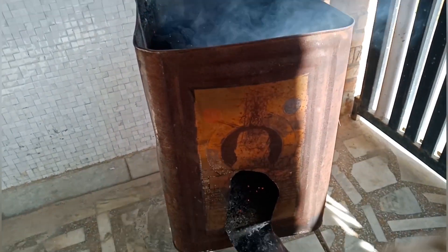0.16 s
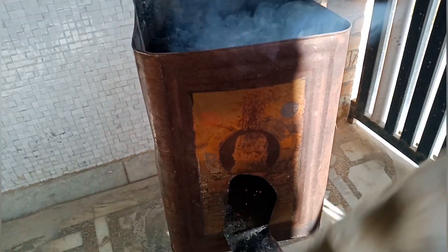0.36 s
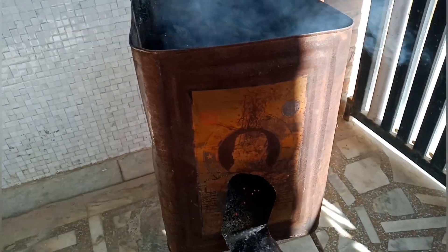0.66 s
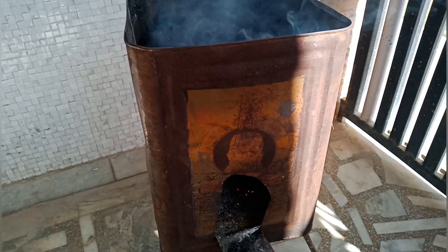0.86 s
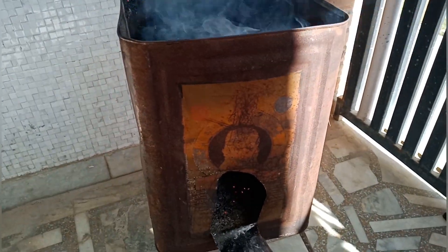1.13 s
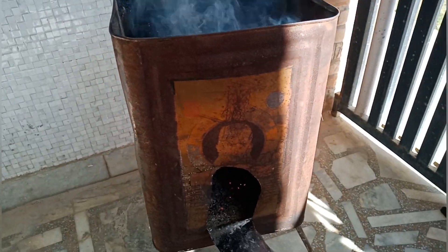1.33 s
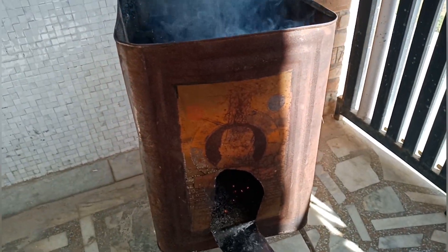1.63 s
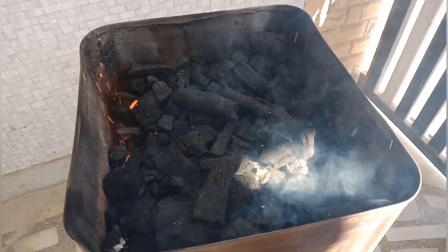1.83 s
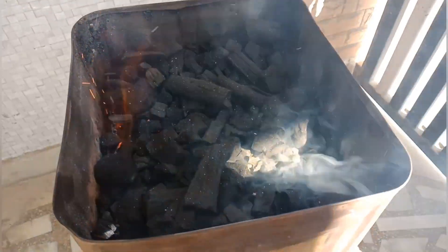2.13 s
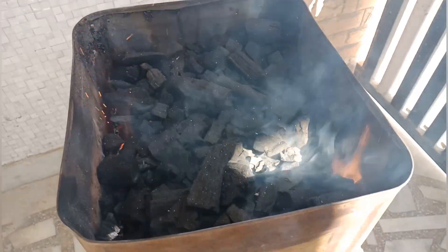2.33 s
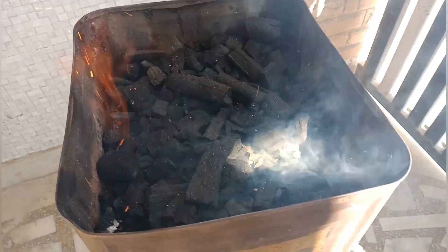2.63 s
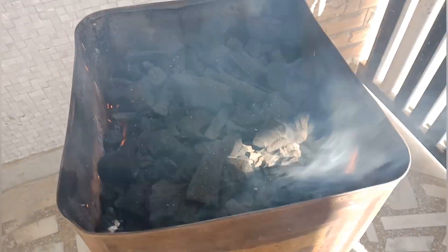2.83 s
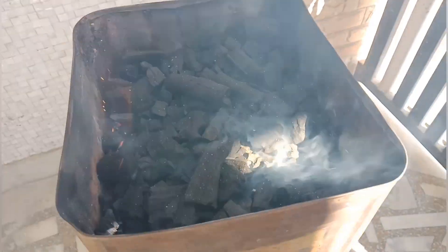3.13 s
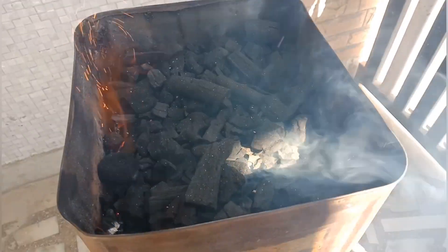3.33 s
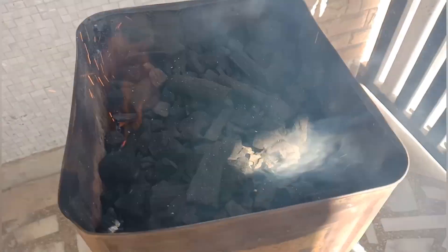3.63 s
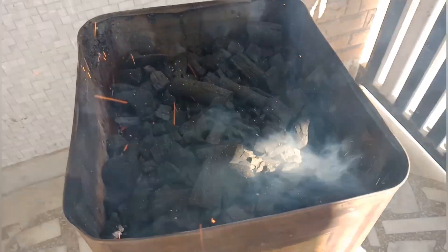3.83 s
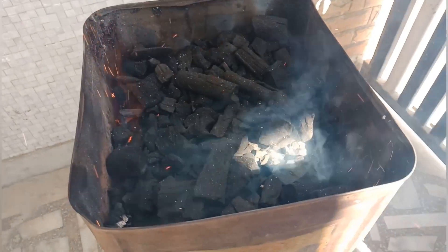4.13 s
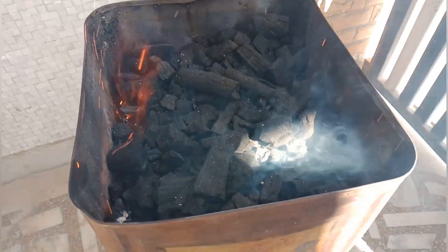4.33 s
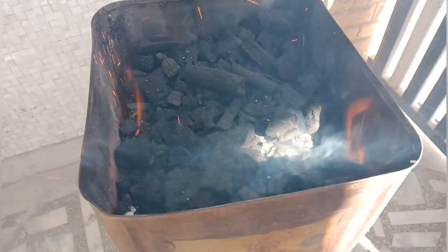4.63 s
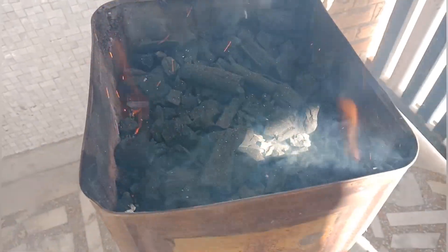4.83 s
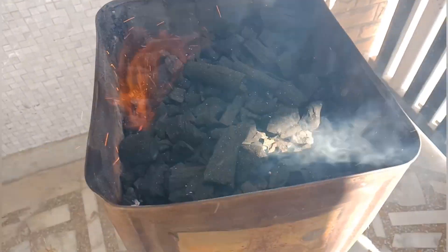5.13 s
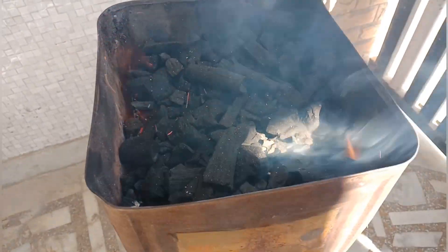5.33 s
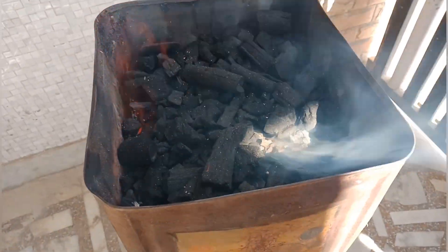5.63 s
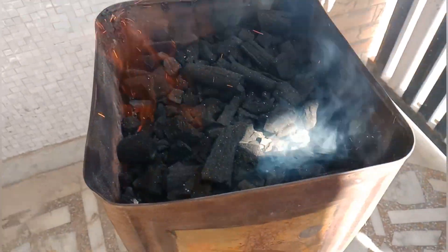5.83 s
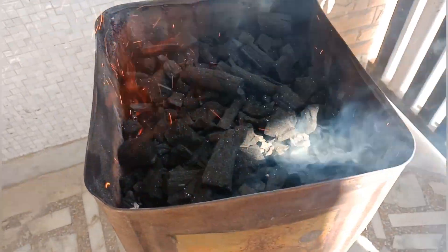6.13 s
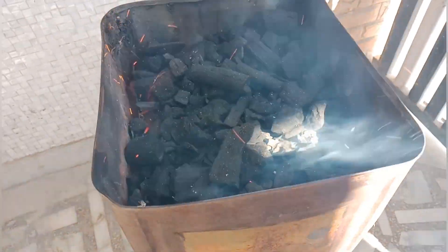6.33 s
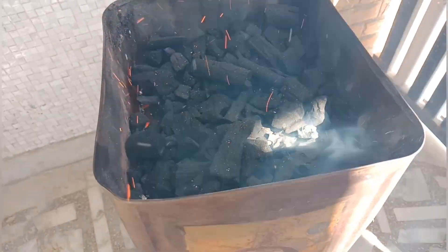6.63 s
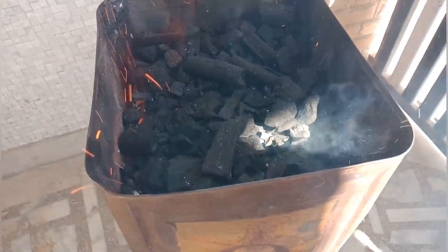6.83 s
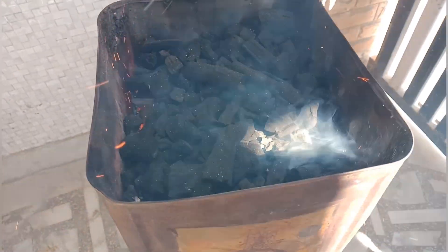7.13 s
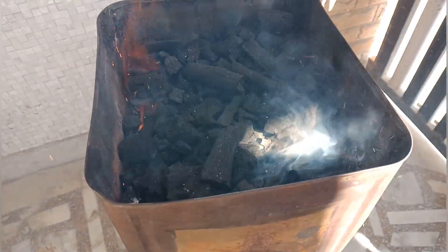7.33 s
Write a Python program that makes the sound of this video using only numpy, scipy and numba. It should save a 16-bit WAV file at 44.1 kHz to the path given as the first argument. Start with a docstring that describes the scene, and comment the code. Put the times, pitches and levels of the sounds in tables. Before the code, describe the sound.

From 0 to 0.9 s a quiet yard gives a soft, steady wide hush and a faint thin hum near 640 Hz. Cardboard makes short airy swishes, with a dull thud at the start and firmer thuds and dry edge ticks around 0.4-0.6 s. At 0.92 s a hard dull bang hits, followed at 1.04 s by a stronger, brighter one; both ring and echo between walls, fading until a cut at 1.77 s. After about 0.07 s of silence, charcoal is suddenly very close from 1.84 s. Loud, sharp, bright pops quickly thicken from 2.04 s, irregular and spread across stereo, with short wall reflections. Among them are swarms of tiny crackles, flickering sizzle, low pressure thumps and fluttering flame rumble. Heavier cracks land near 2.39, 4.3, 5.03, 5.39, 6.01 and 7.22 s. The beds briefly duck around the loudest pops; crackling stays dense to the end, about 7.46 s.

```python
"""Cardboard swishes and thuds over a quiet yard, then two hard bangs ring out and echo between the walls.
After a short silence the charcoal in a tin stove is close: loud pops, small pops, sizzle and flame rumble.
Pops and blows are coloured noise bursts with sharp fronts, the swishes and beds are shaped noise, the walls
are noise tails fading per octave, and a thin hum stays through both parts.
A look-ahead gain control leans in before loud sounds and lets go after them."""
import sys
import numpy as np
from scipy import signal
from scipy.fft import rfft, irfft, next_fast_len
from scipy.io import wavfile
from scipy.ndimage import uniform_filter1d, minimum_filter1d
from numba import njit

SR = 44100
rng = np.random.default_rng(int(sys.argv[2]) if len(sys.argv) > 2 else 0)


def transcribe(u):
    """Save the signal u as a 16-bit wav file named by the first command-line argument.

    u: samples, shape (n,) or (channels, n), limited to [-1, 1]; the rate is SR.
    q: integer samples, one column per channel.
    """
    v = np.clip(np.atleast_2d(u).T, -1, 1)
    q = np.round(v * 32767).astype(np.int16)
    wavfile.write(sys.argv[1], SR, q)


N = 329118
T = np.arange(N) / SR
LEAD = 64  # samples of build-up before a crack
KNEE_DB, RATIO = -6, 2.013  # gain control: threshold, input dB per output dB above it

# Fire between the loud pops. Each row: time in seconds, sizzle guide level in dB (small pops are set above
# it, the bed below it), flame rumble level in dB before flicker.
FIRE = [(1.84, -47, -53), (2.0, -43, -50), (2.23, -29, -40.5), (2.56, -32, -44), (2.87, -39.5, -47.5),
        (4.27, -32, -41), (4.53, -30.5, -49), (4.78, -41, -49), (5.27, -40.5, -49), (5.45, -27.5, -34),
        (5.66, -54, -50.5), (5.94, -24.5, -47.5), (6.41, -34, -36), (6.61, -26, -45.5), (6.97, -41.5, -47),
        (7.46, -22.5, -43.5)]
# Colour of the pops and of the sizzle. Each row: frequency in Hz, relative level in dB per Hz.
POP_TONE = [(150, -14.5), (350, 1.5), (730, 2), (1560, 8.5), (1780, -1), (2150, 2), (5400, 3), (8100, -7),
            (14800, -16), (16300, -22)]


def undb(db):
    """Gain of a level in dB."""
    return 10 ** (np.asarray(db) / 20)


def tone(table, size):
    """Bin gains of (Hz, dB) points: closed below the first, level above the last."""
    hz, db = np.transpose(table)
    bins = np.fft.rfftfreq(size, 1 / SR) + 1
    return undb(np.interp(np.log(bins), np.log(hz), db, left=-90, right=db[-1]))


def hiss(gain, alike):
    """Stereo noise of rms 1 with given bin gains; bass mostly shared by the ports, treble by the share alike."""
    size = 2 * (gain.shape[-1] - 1)
    bass = 1 / (1 + (np.fft.rfftfreq(size, 1 / SR) / 710) ** 2)  # crossover in Hz
    alike = np.clip(alike + (.85 - alike) * bass, 0, 1)
    white = rng.standard_normal(gain.shape[:-1] + (2, size))
    mid, side = gain * rfft(white).swapaxes(0, -2)
    mid, side = np.sqrt(1 + alike) * mid, np.sqrt(1 - alike) * side
    out = irfft(np.array([mid + side, mid - side]))
    return out / np.sqrt(np.mean(out ** 2))


def steady(table, alike):
    """A full-length noise of a given colour."""
    return hiss(tone(table, next_fast_len(N + 1) * 2), alike)[:, :N]


def walk(rate):
    """Random levels, one every 1 / rate seconds, joined by straight slews; spread somewhat below 1."""
    k = int(SR / rate)
    steps = np.repeat(rng.standard_normal(N // k + 1), k)
    return uniform_filter1d(steps, k)[:N]


def place(s, grains):
    """Lays grains (2, events, samples) out at their times in seconds."""
    length = grains.shape[2]
    out = np.zeros((2, N + length))
    for k, i in enumerate((np.asarray(s) * SR).astype(int)):
        out[:, i:i + length] += grains[:, k]
    return out[:, :N]


def echo(x, t60_table, colour):
    """Walls return a diffuse tail, each octave fading at its own rate."""
    t, tail = np.arange(65536) / SR, 0
    bins = np.fft.rfftfreq(len(t), 1 / SR) + 1
    t60_hz, t60_s = np.transpose(t60_table)
    for hz in 90 * 2. ** np.arange(8):
        t60 = np.interp(np.log(hz), np.log(t60_hz), t60_s)
        band = np.clip(1 - np.abs(np.log2(bins / hz)), 0, 1)
        tail = tail + np.sqrt(hz) * hiss(band, 0) * 10 ** (-3 * t / t60)
    onset = np.clip(t / 0.001, 0, 1)
    tail = irfft(rfft(tail) * tone(colour, len(t))) * onset
    tail = tail / np.sqrt(np.sum(tail ** 2) / 2)
    return signal.fftconvolve(x, tail, axes=1)[:, :N]


def at_source(db):
    """The level ahead of the gain control that its curve turns into the level given."""
    return db + (RATIO - 1) * np.maximum(db - KNEE_DB, 0)


def cracks(hz, colour, t60_s, ring_db, ring_t60_s, alike):
    """Bursts of mid peak 1: sharp front, crack coloured around its centre, brief bright tick and short rattle."""
    t = (np.arange(2048) - LEAD) / SR
    bins = np.fft.rfftfreq(2048, 1 / SR) + 1
    after, rise = np.maximum(t, 0), np.exp(np.minimum(t, 0) / 0.00068)
    hump = .4 + 1 / (1 + (np.log2(bins / hz[:, None]) / .45) ** 2)
    # a return from the tin wall a few cm away hollows out bands, differently for every crack
    return_s = rng.uniform(.0002, .0007, (len(hz), 1))
    hump = hump * np.abs(1 + .4 * np.exp(2j * np.pi * bins * return_s))

    bright = np.clip(np.log2(bins / 6000) / 0.36, 0, 1)
    fade = 10 ** (-3 * after / t60_s) + undb(ring_db) * 10 ** (-3 * after / ring_t60_s)
    body = hiss(colour * hump * (1 - 0.67 * bright), alike) * fade
    share = np.sqrt(np.sum((colour * bright) ** 2) / np.sum(colour ** 2))
    tick = hiss(colour * bright * np.ones_like(hump), alike) * 10 ** (-3 * after / (0.84 * t60_s))
    burst = rise * (body + 0.35 * share * tick)

    # the front arrives 0.3 ms in, with a small random lag between the ports
    port_lag_s = .0001 * rng.standard_normal((len(hz), 1)) * np.array([.5, -.5])[:, None, None]
    late = LEAD / SR + .0003 + port_lag_s
    phase = 2j * np.pi * (rng.random((len(hz), 1)) - (bins - 1) * late)
    front = irfft(colour * hump * np.exp(phase))
    front = front / np.abs(front).max(axis=2, keepdims=True)
    burst = burst + undb(13) * rise * front  # dB over the rms of the noise before fading
    return burst / np.abs(burst.mean(axis=0)).max(axis=1, keepdims=True)


def loud_pops():
    """Coals burst as bright cracks; the nearest wall returns each once and the balcony adds a diffuse tail."""
    # Each row: time in seconds, peak in dB meant after the gain control, centre in Hz, left minus right in dB.
    pops = [(1.8524, -20.5, 5230, -7), (1.903, -23, 3980, 0), (1.933, -26, 5070, -11), (1.99, -20, 4000, 2),
            (2.0436, -1.5, 2820, 4), (2.0472, -6.0, 5050.0, 7), (2.0922, -6, 3680.0, 1.0),
            (2.116, -4, 4310, -4), (2.1316, -2.5, 5040, -1.0), (2.1393, -1.5, 3560, -2),
            (2.2345, -16, 3929, -5), (2.2487, -2, 4960, -4), (2.3063, -3.0, 5500, -5.5),
            (2.36, -2, 4200, 3.0), (2.3873, 3.5, 3800, 4), (2.5598, -3, 4930, 3), (2.6555, -2.5, 5400, 3),
            (2.7317, -10, 5300, -4), (2.763, -11, 3430.0, -2), (2.7726, -3, 3920.0, -1),
            (2.8205, -9, 3360.0, 4), (2.8319, -11.5, 4900, -6), (2.918, -6.5, 5400, 0),
            (2.9378, -16, 3700.0, 7), (2.9517, -5, 5450, -6), (3.0253, -19, 3500, -11),
            (3.0777, -8, 5700, -3.0), (3.1188, -8, 3540.0, 2), (3.1626, -2.0, 5770, -3),
            (3.1944, -6, 4240.0, -2.0), (3.1994, -0.5, 3400, 2.5), (3.2403, -0.5, 3440, -2),
            (3.3716, -2.5, 3600, 7), (3.4273, -1, 4020, 7.0), (3.5272, -6, 5210.0, -1.0),
            (3.5311, -4.5, 4000, 1), (3.5823, -1, 4200, 1.0), (3.6265, -7, 4700, -1),
            (3.6465, -7, 4600.0, -3.0), (3.666, -9.0, 3100, 7), (3.6724, -7, 2970, 4.0),
            (3.7625, -19, 5300.0, -7), (3.7835, -2, 5450, -4), (3.8254, -1.5, 4960, -1),
            (3.8841, -11, 3350, 4), (3.9106, -5.5, 4900, 0), (3.9276, -5, 4920, 4), (4.008, -4, 4730, -3.0),
            (4.0195, -13.5, 3950.0, -3.0), (4.0646, -6, 4460.0, 0), (4.0723, -4.5, 5010, -4.0),
            (4.0843, -4.0, 3840, -1.0), (4.0921, -3.5, 1860, -3), (4.0981, -4, 3460, 0),
            (4.1422, -8, 2080.0, 6.0), (4.1548, -4, 4850.0, -7), (4.1586, -3.5, 3380, 5),
            (4.1725, -6, 3450, 2.0), (4.213, -9.5, 4960.0, 0), (4.222, -4.5, 4060.0, -2),
            (4.2511, -1, 5650, 0.0), (4.2865, -2.5, 4430, -4.0), (4.2996, 0, 1670.0, -3),
            (4.307, -2, 4170.0, 3), (4.338, -4, 3780.0, 2), (4.3888, -6, 3230.0, -1),
            (4.4618, -7, 3170.0, -2.0), (4.4867, -1.5, 4250.0, -0.5), (4.5035, -13, 4600, 3),
            (4.5528, -2.0, 5100, -4.5), (4.6134, -6, 3500, 2), (4.6544, -1.5, 3300, 3.0),
            (4.6686, -1.5, 4180.0, -1), (4.6798, -3, 4130, -1), (4.8169, -16, 4150, -7),
            (4.9372, -7.5, 3280, 5), (4.943, -4.5, 3960.0, -4), (4.9822, -2.5, 3550.0, -2),
            (5.0303, 3, 1680, 0.0), (5.1131, -6.5, 3550.0, 2.0), (5.1218, -0.5, 3060, -1.0),
            (5.1869, -10, 3320, -3), (5.2732, -18, 5330.0, -4), (5.301, -10.5, 3040, 9.0),
            (5.3397, -14, 4000, -5), (5.3896, 2, 2625, 2), (5.4, -9, 3780.0, -2), (5.4833, -10, 4140.0, -8),
            (5.634, -3, 5440, -5), (5.6975, -1.5, 4000, -5), (5.7234, -10, 4770.0, -4.0),
            (5.7432, -6.5, 4750, -2), (5.7913, -1, 5250, -0.5), (5.8663, -5, 3270, 5.0),
            (5.8847, -7.5, 4810.0, -11), (5.903, -1.5, 4170, 4.5), (5.9291, -4.5, 5260.0, -4.0),
            (5.952, -1.0, 3400, -2), (5.9636, -13, 4430, -4), (5.9702, -4, 5230, -8),
            (6.0149, 3.5, 3540, -2), (6.0563, -3, 3420.0, 1), (6.0676, -5.5, 4770, -5),
            (6.087, -6.5, 4830, 0.0), (6.1333, -5.0, 3940, 2.0), (6.1548, -9, 2940.0, 6),
            (6.1837, -4, 3900, -1), (6.2336, -1.5, 2745, -1), (6.3118, -4, 3770.0, -0.5),
            (6.3973, -1.5, 3290, -0.5), (6.4204, -1, 4130, -7), (6.48, -7.5, 3200.0, 3),
            (6.5229, 0.0, 3600, 1), (6.5848, 1.5, 3206, -1.5), (6.5998, -3.5, 3820.0, -1.0),
            (6.6329, -9.5, 2240, -2.0), (6.6497, -12, 3310.0, 6.0), (6.6824, -3.5, 3970, -5),
            (6.6947, -7.5, 2690.0, 0.0), (6.7261, -7.5, 3590.0, 1), (6.775, -2, 4920, 2),
            (6.7911, -4.5, 5200, -11), (6.8386, -12, 3950.0, 5), (6.844, -5, 5260, -3.0),
            (6.9126, -3.5, 5060, -2), (6.987, -10, 4140.0, 1), (7, -6.5, 4660, -5), (7.0552, -10, 2900, 1),
            (7.1212, -15, 4190.0, 0.0), (7.1383, -8, 2920, 4), (7.171, -4, 4580, -3.0),
            (7.2016, -1, 4700, 7), (7.224, 3, 2500.0, 4), (7.2726, 1.5, 4840, -1),
            (7.3268, -6.0, 3260, 2.0), (7.3398, -9.5, 3660, 4), (7.3775, -1, 3970, 0),
            (7.3963, -4.5, 5510.0, -1), (7.4554, 1, 5040, -0.5)]
    # Each row: frequency in Hz, echo decay time t60 in seconds.
    balcony_t60 = [(300, 0.28), (1200, 0.13), (4000, 0.37), (12000, 0.028)]
    # Each row: frequency in Hz, relative echo level in dB per Hz.
    balcony_tone = [(150, -5.5), (350, 1.5), (700, -8), (1300, 3), (1780, 3), (5400, 4), (7800, -16),
                    (16300, -2.5)]
    s, db, hz, pan_db = np.transpose(pops)
    size = undb(at_source(db) + np.array([pan_db, -pan_db]) / 2)[:, :, None]
    burst = cracks(hz, tone(POP_TONE, 2048), t60_s=0.0045, ring_db=-7, ring_t60_s=0.035, alike=0.64)
    near = place(s - LEAD / SR, size * burst)
    wall = int(0.008 * SR)
    # the wall's return swaps the ports and is a little duller
    near[:, wall:] += undb(-20.5) * uniform_filter1d(near[::-1, :-wall], size=3)
    # the walls hear each pop from all sides, as a plain spike; the echo grows by 0.87 dB per dB
    echo_db = 22 - 15.5 + 0.87 * at_source(db)
    sent = place(s, undb(echo_db)[:, None] * np.ones((2, 1, 1)))
    return near + echo(sent, balcony_t60, balcony_tone)


def thump(push_hz, port_hz):
    """The pressure pulse of a near pop: a quick suck, then a slow overshoot from the bass cut of the ports."""
    t = np.arange(2048) / SR
    push = -t * np.exp(-2 * np.pi * push_hz[:, None] * t)
    push = signal.sosfilt(signal.butter(2, port_hz, "high", fs=SR, output="sos"), push)
    return push / np.abs(push).max(axis=1, keepdims=True)


def gas_puffs():
    """Gas from near pops pushes on the ports, leaning at random to one side."""
    # Each row: time in seconds, peak in dB meant after the gain control (before the lean), quickness in Hz.
    puffs = [(2.3868, 2, 300), (2.5598, -9.5, 326), (2.6573, -13.5, 314), (3.164, -13.5, 304),
             (3.8258, -10, 306), (4.0849, -7, 710), (4.0941, -6, 700), (4.2994, 3, 370), (4.4869, -9, 318),
             (4.553, -10, 306), (5.388, -5, 420), (5.697, -10, 302), (5.791, -11, 298), (6.422, -12.5, 304),
             (6.523, -6.5, 306), (6.683, -11, 302), (6.774, -13.5, 307), (7.0, -17, 300), (7.3774, -6, 326)]
    s, db, hz = np.transpose(puffs)
    lean_db = np.array([3.2, -3.2])[:, None, None] * rng.standard_normal((len(s), 1))
    return place(s, undb(at_source(db)[:, None] + lean_db) * thump(hz, 96))


def small_pops():
    """A random crowd of brief cracks, rising and falling with the sizzle and clustering in level."""
    when, sizzle_db, _ = np.transpose(FIRE)
    span_s = when[-1] - when[0]
    spot, luck, pitch, side = rng.random((int(130 * span_s), 4)).T  # 130 per second
    s = when[0] + spot * span_s
    excess_db = np.minimum(-3.5 * np.log(luck), 8)  # few are loud
    pan_db = 6 * (side - .5) * np.array([[1], [-1]])
    cluster_db = 3.5 * walk(16)[(s * SR).astype(int)]
    db = np.interp(s, when, sizzle_db) + 9.5 + excess_db + pan_db + cluster_db
    burst = cracks(1900 * 3.5 ** pitch, tone(POP_TONE, 2048), t60_s=0.00081, ring_db=-2,
                   ring_t60_s=0.019, alike=0.18)
    return place(s, undb(db)[:, :, None] * burst)


def sizzle():
    """Fine wide noise in the colour of the pops, its level flickering at three rates."""
    when, sizzle_db, _ = np.transpose(FIRE)
    flicker_db = 3.7 * walk(43) + 2.9 * walk(7.6) + 3.3 * walk(500)
    return steady(POP_TONE, 0.13) * undb(np.interp(T, when, sizzle_db) - 11.5 + flicker_db)


def flame():
    """Low noise rumbles alike in both ports and flutters quickly and slowly."""
    # Each row: frequency in Hz, relative level in dB per Hz.
    flame_tone = [(18, -47), (30, -30), (86, 7), (166, -3), (362, 8), (700, -18.5), (910, 0), (1540, -120)]
    when, _, flame_db = np.transpose(FIRE)
    flutter_db = 4.4 * walk(25) + 2.5 * walk(8)
    return steady(flame_tone, 1.0) * undb(np.interp(T, when, flame_db) + flutter_db)


def coals():
    """The whole fire: loud pops with echo, puffs, small pops, sizzle and flame rumble."""
    return loud_pops() + gas_puffs() + small_pops() + sizzle() + flame()


def tray():
    """Cardboard strokes are swells of noise, thuds are dull rings with a scrape, and the edge ticks dryly."""
    # Each row: frequency in Hz, relative level in dB per Hz.
    rustle_tone = [(500, 7), (1700, 4), (4400, 4), (7400, -14.5), (16300, -54)]
    # Strokes, before flicker. Each row: middle in seconds, length in seconds, level in dB, centre in Hz.
    swishes = [(0.067, .1, -37, 2860), (0.308, .11, -33, 2380), (0.419, 0.057, -40, 3540),
               (0.491, 0.079, -37, 3500), (0.543, 0.03, -32, 1950), (0.582, 0.093, -33, 2210),
               (0.743, 0.12, -40.5, 2860), (0.8, 0.13, -36.5, 4050)]
    # Thuds, before flicker. Each row: start in seconds, level in dB, pitch in Hz, t60 in seconds.
    thuds = [(.001, -30, 91, 0.064), (0.414, -39, 153, 0.55), (0.477, -23, 134.4, 0.16),
             (0.537, -29, 246, 0.23), (0.574, -42, 250, 0.7)]
    # Ticks of the cardboard edge. Each row: time in seconds, peak in dB, centre in Hz.
    edge_ticks = [(0.535, -22, 1700), (0.5385, -32, 2500), (0.574, -24, 2000)]
    out, t = 0, np.arange(8192) / SR
    bins = np.fft.rfftfreq(8192, 1 / SR) + 1
    rustle = tone(rustle_tone, 8192)
    for s, length, db, hz in swishes:
        colour = rustle * (0.92 + 1 / (1 + (np.log2(bins / hz) / .5) ** 2))
        stroke = t / length - .5  # 0 at the middle
        swell = np.where(stroke < 0, np.exp(-(stroke / 0.34) ** 2), np.exp(-stroke / 0.43))
        out = out + place([s - length / 2], (undb(db) * hiss(colour, 0.1) * swell)[:, None])
    for s, db, hz, t60 in thuds:
        scrape = hiss(rustle, 0.38) * np.exp(-t / 0.0015)
        dull = hiss(1 / (1 + (np.log2(bins / hz) / 0.52) ** 4), 0.74)
        ring = np.sin(2 * np.pi * hz * t) + 0.5 * scrape + 0.98 * dull
        fade = np.clip(t / 0.0021, 0, 1) * 10 ** (-3 * t / t60)
        out = out + place([s], (undb(db) * ring * fade)[:, None])
    s, db, hz = np.transpose(edge_ticks)
    burst = cracks(hz, tone(rustle_tone, 2048), t60_s=0.006, ring_db=2, ring_t60_s=0.04, alike=0.3)
    ticks = place(s - LEAD / SR, undb(db)[:, None] * burst)
    return out * undb(2.5 * walk(150) + 2.5 * walk(400)) + ticks


def bangs():
    """Two hard blows, dull and wet: the struck thing rings and the yard returns them for a second."""
    # Each row: time in seconds, peak in dB meant after the gain control, crack centre in Hz, echo share in dB.
    blows = [(0.9202, 0.5, 686, -1.5), (1.0364, 5, 1010, -7)]
    # One list for each blow. Each row: frequency in Hz, relative echo level in dB per Hz.
    echo_tones = [
        [(100, -27), (271, -0.5), (1050, -3), (1360, -12), (5920, -28), (9000, -57)],
        [(60, -45), (255, -10), (328, -17.5), (669, -0.5), (1000, -2), (1400, -2), (2600, -10), (9000, -64)],
    ]
    # What the blows ring with. Each row: pitch in Hz, usual level in dB re blow, t60 in seconds.
    modes = [(268.5, -30.5, 0.28), (652, -36.5, 0.73), (750, -33.5, 0.56), (820, -28.5, 0.18),
             (1270, -15, 0.066)]
    # Slaps of the second blow off far walls. Each row: delay in seconds, gain in dB before the band filter.
    slaps = [(0.012, -10.5), (0.079, -16.5), (.09, -29)]
    # Each row: frequency in Hz, echo decay time t60 in seconds.
    yard_t60 = [(100, 1.6), (300, 1.22), (800, 1.07), (2000, 0.78), (4000, 0.71)]
    out, t = 0, np.arange(32768) / SR
    bins = np.fft.rfftfreq(2048, 1 / SR) + 1
    colour = (bins / 150) ** 2 / (1 + (bins / 150) ** 2) / (1 + (bins / 1700) ** 2.6)
    # the first bang's tail drops away just before the second
    choke = undb(np.interp(T, (1.016, 1.1)[::-1], (0, -17.5)))
    for (s, db, hz, wet_db), echo_tone in zip(blows, echo_tones):
        level = undb(at_source(db))
        blow = level * cracks(np.array([hz]), colour, t60_s=0.032, ring_db=-0.45, ring_t60_s=0.038, alike=0.77)
        ring = 0
        for f, mode_db, t60 in modes:
            gain = undb(mode_db + 4.4 * rng.standard_normal((2, 1, 1)))
            ring = ring + gain * np.sin(2 * np.pi * f * t) * 10 ** (-3 * t / t60)
        spike = place([s], undb(at_source(db) + wet_db + 15.5) * np.ones((2, 1, 1)))
        out = out * choke + place([s - LEAD / SR], blow) + place([s], level * ring)
        out = out + echo(spike, yard_t60, echo_tone)
    # slaps swap the ports and lose both treble and bass
    slap = uniform_filter1d(blow[::-1], size=9) - uniform_filter1d(blow[::-1], size=70)
    for late, loss_db in slaps:
        out = out + place([s + late], undb(loss_db) * slap)
    return out


def yard():
    """The quiet yard: a soft wide noise, nearly steady."""
    # Each row: frequency in Hz, relative level in dB per Hz.
    yard_tone = [(30, -9), (150, -2.5), (300, -1), (420, -6.5), (750, -10), (2000, -13), (5000, -22.5),
                 (7500, -40), (16300, -38.5)]
    return undb(-44.5 + 0.27 * walk(31.0)) * steady(yard_tone, 0.13)


def hum():
    """A faint thin sine that wavers a little in pitch and level."""
    hz = 641 * (1 + .003 * walk(12))
    return undb(-54.5 + walk(8.4)) * np.sin(2 * np.pi * np.cumsum(hz) / SR)


def scene():
    """Tray and bangs in the yard, a short silence, then the coals close by; the hum is in both parts."""
    far = tray() + bangs() + yard()
    steady_hum = hum()
    return (far + steady_hum) * (T < 1.773) + (coals() + steady_hum) * (T > 1.842)


@njit
def recover(cut_db, keep):
    """Gain cuts bite at once and let go exponentially."""
    out, held = np.empty(len(cut_db)), 0.
    for i in range(len(cut_db)):
        held = max(cut_db[i], held * keep)
        out[i] = held
    return out


def record(dry):
    """Look-ahead gain control, bass cut, clipping at full scale, and the top cut."""
    ahead_s, attack_s, release_s = 0.019, 0.015, 0.027
    level_db = 20 * np.log10(np.abs(dry.mean(axis=0)) + 1e-9)
    over_db = np.maximum(level_db - KNEE_DB, 0)
    ahead = int(ahead_s * SR)
    # the cut needed by the loudest sample still to come within the look-ahead
    cut_db = -minimum_filter1d(-over_db * (1 - 1 / RATIO), ahead, origin=-(ahead // 2))
    # run backwards in time, the release becomes a gradual lean-in
    cut_db = recover(cut_db[::-1].copy(), np.exp(-1 / (attack_s * SR)))[::-1].copy()
    cut_db = uniform_filter1d(recover(cut_db, np.exp(-1 / (release_s * SR))), size=96)
    # the left port is duller at the top, the right one brighter
    dry = dry + np.array([[.12], [-.12]]) * np.diff(dry, 2, prepend=0, append=0)
    dry = signal.sosfilt(signal.butter(1, 30, "high", fs=SR, output="sos"), dry)
    low = signal.ellip(10, .2, 70, 16300, fs=SR, output="sos")
    return signal.sosfilt(low, np.clip(dry * undb(-cut_db), -1, 1))


dry = scene()
out = record(dry)
transcribe(out)
```